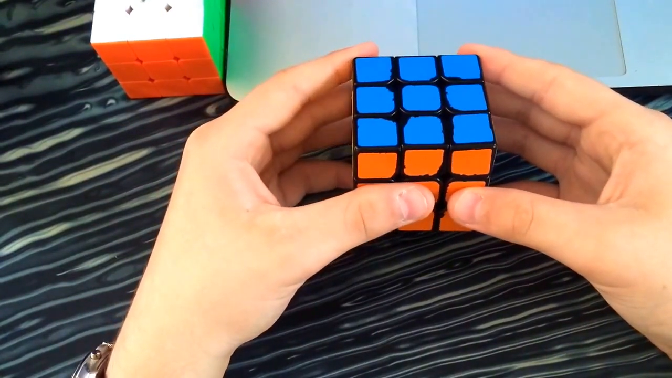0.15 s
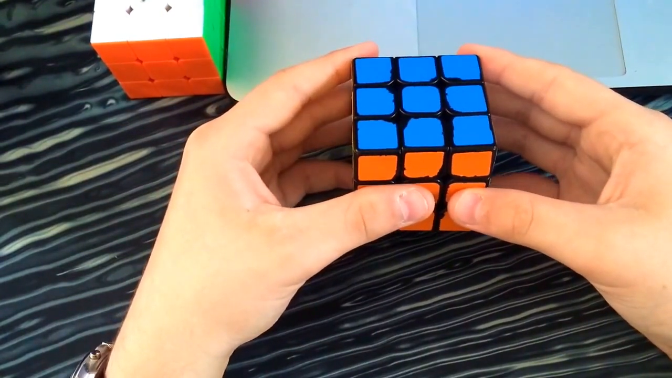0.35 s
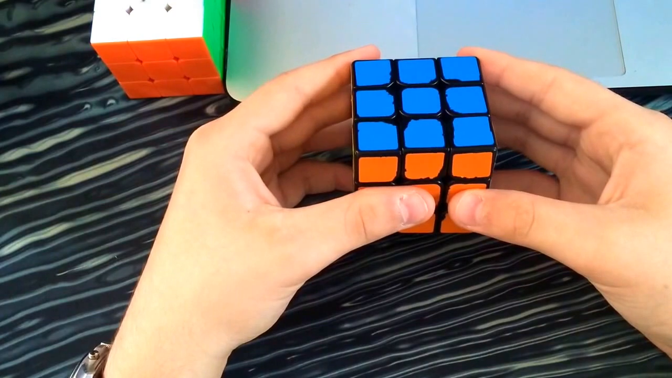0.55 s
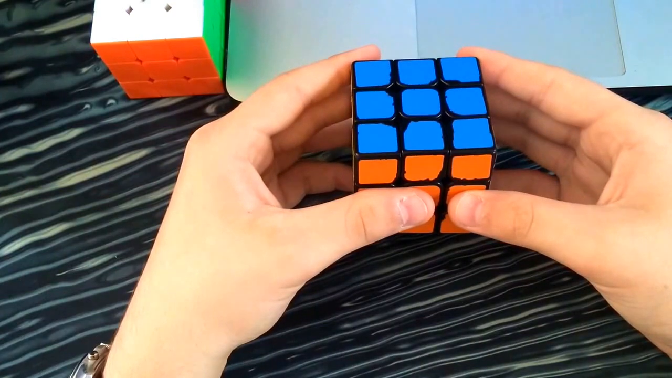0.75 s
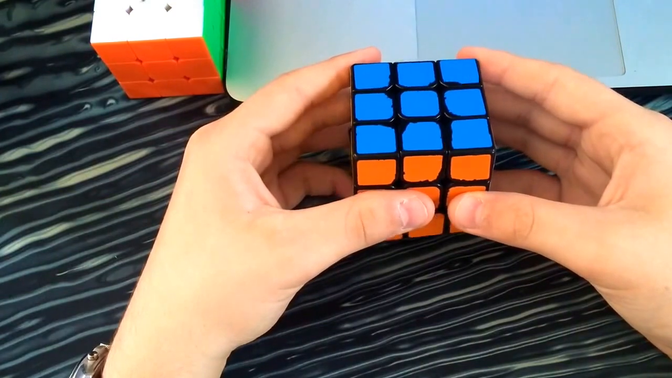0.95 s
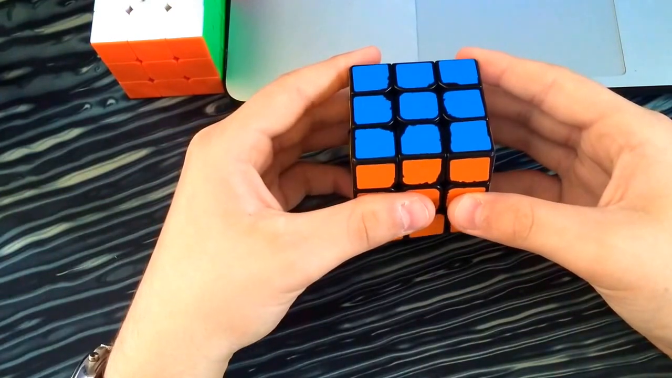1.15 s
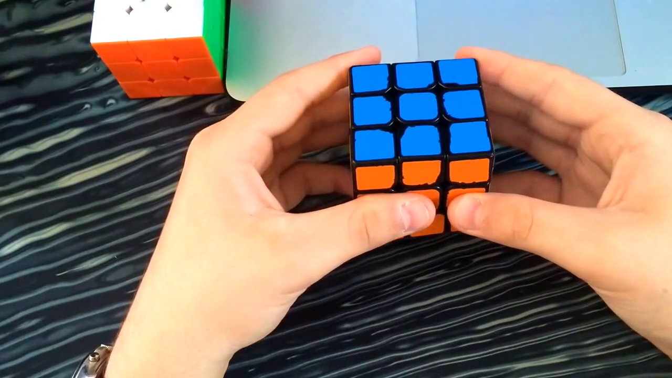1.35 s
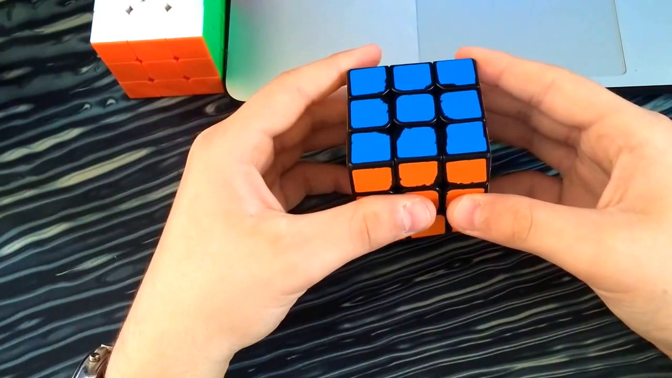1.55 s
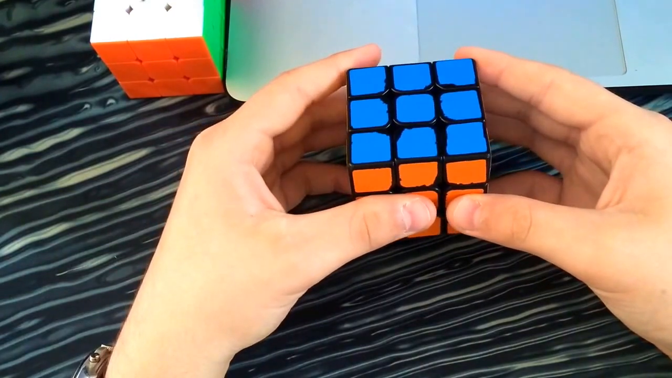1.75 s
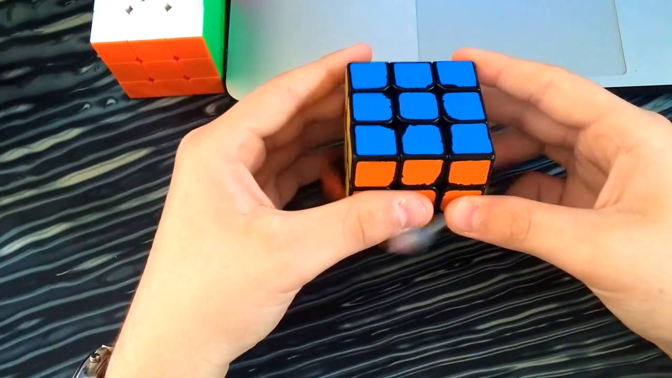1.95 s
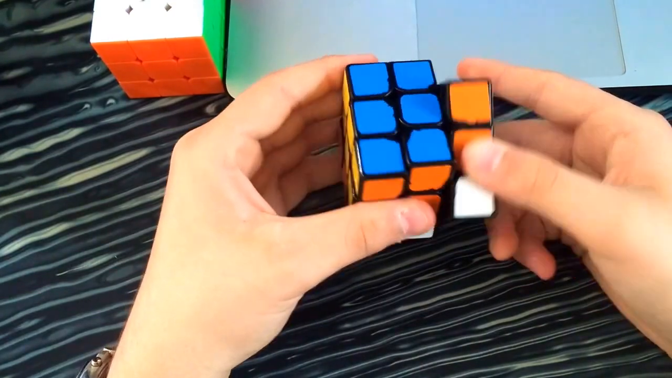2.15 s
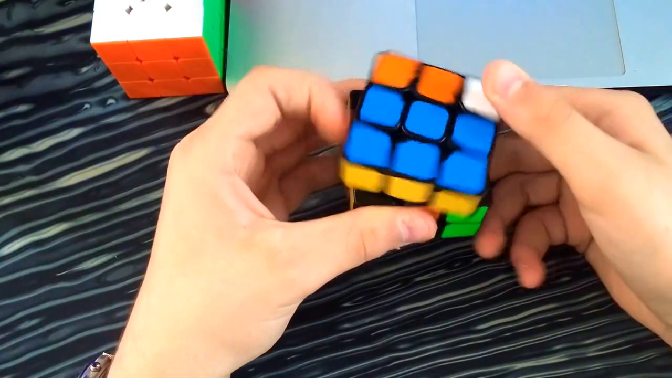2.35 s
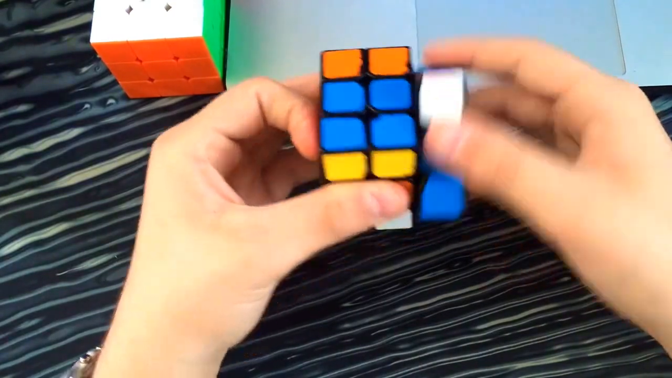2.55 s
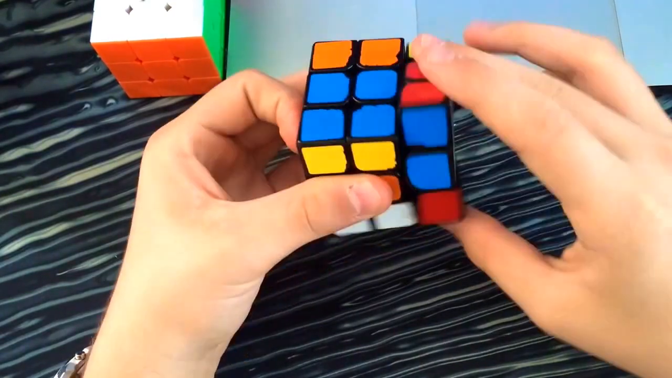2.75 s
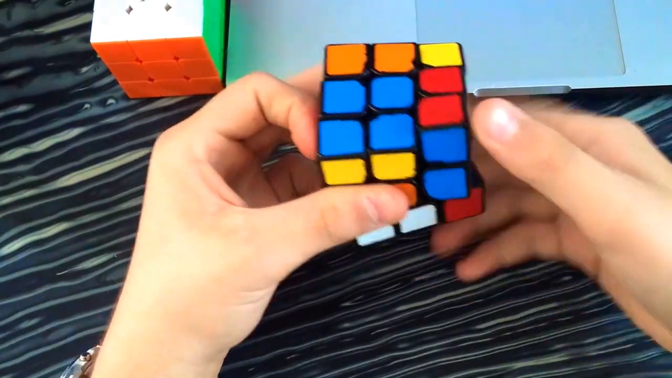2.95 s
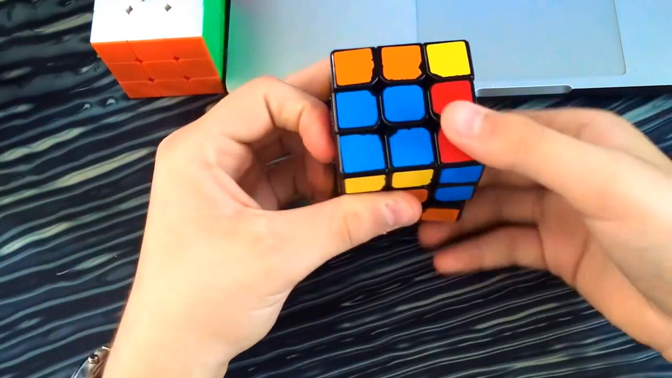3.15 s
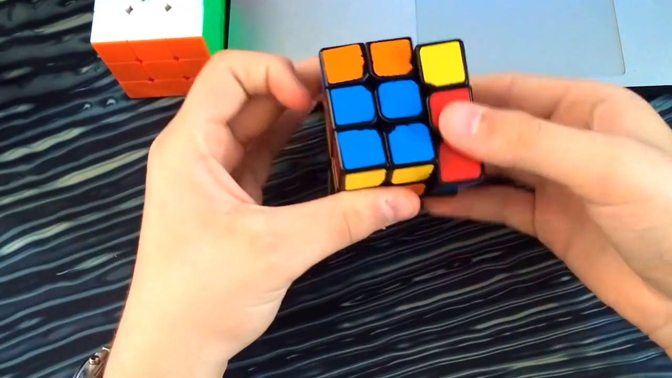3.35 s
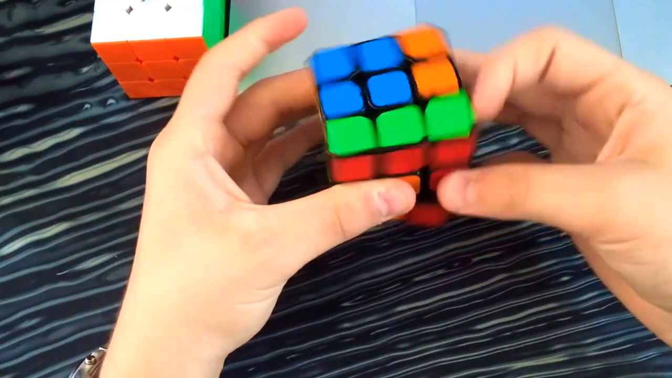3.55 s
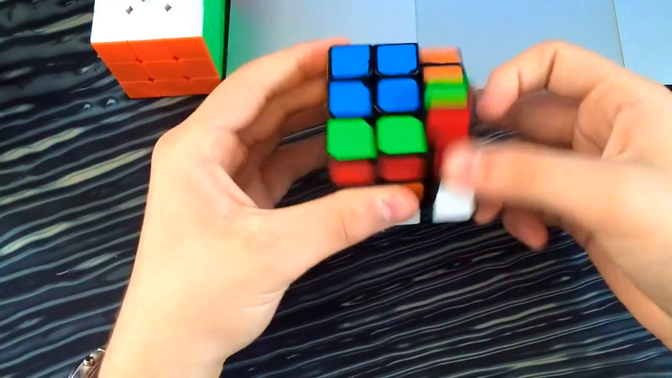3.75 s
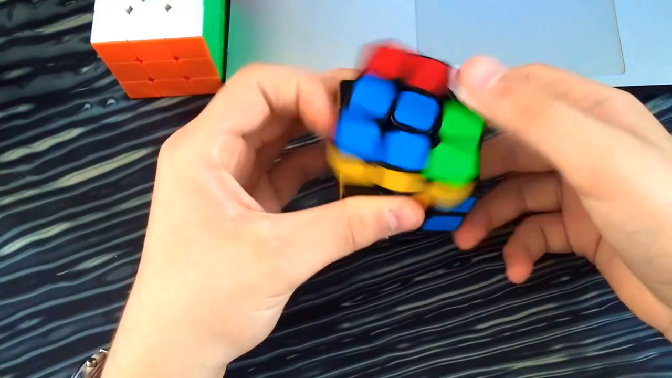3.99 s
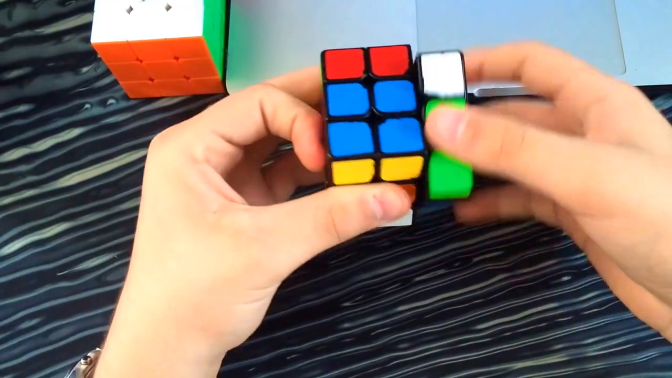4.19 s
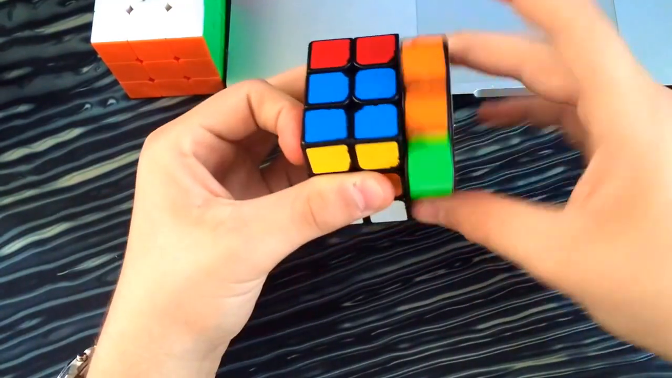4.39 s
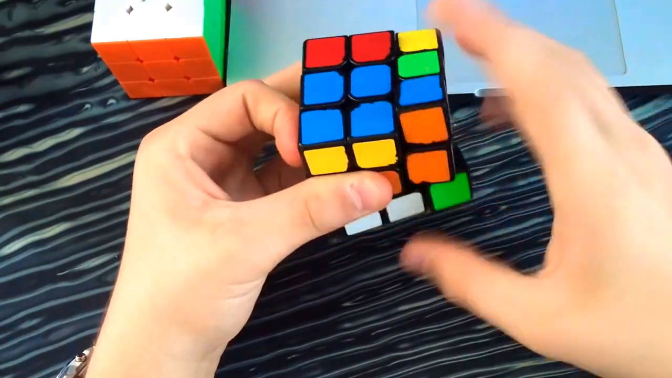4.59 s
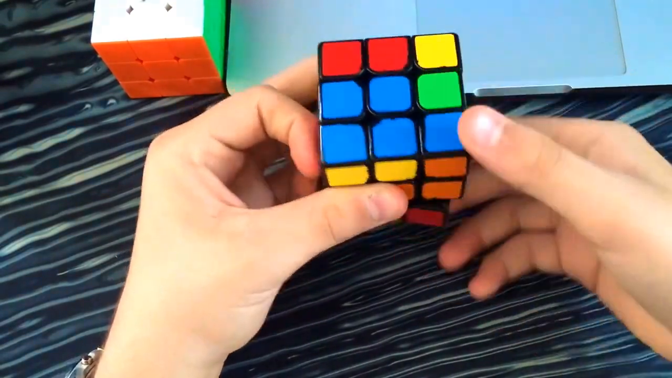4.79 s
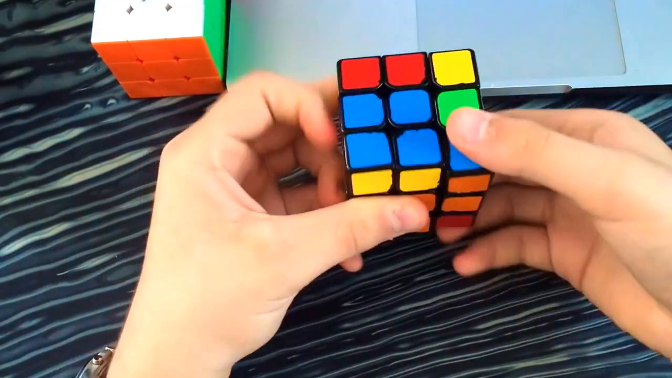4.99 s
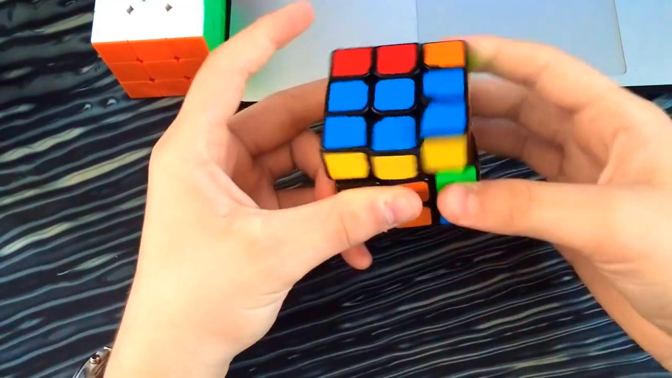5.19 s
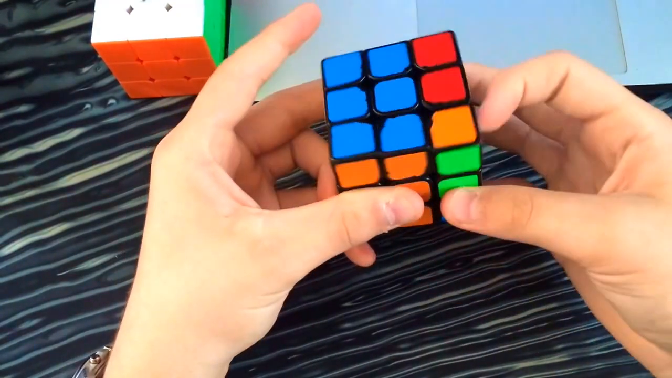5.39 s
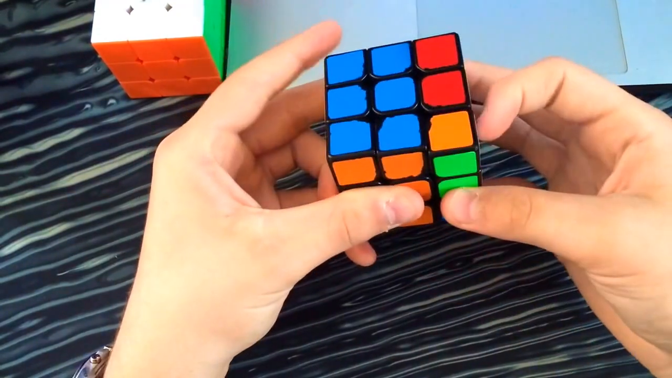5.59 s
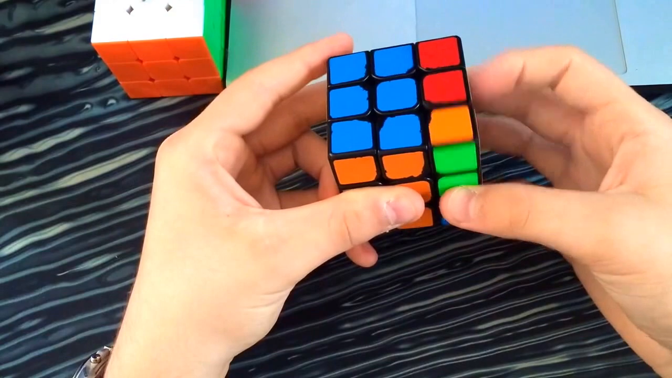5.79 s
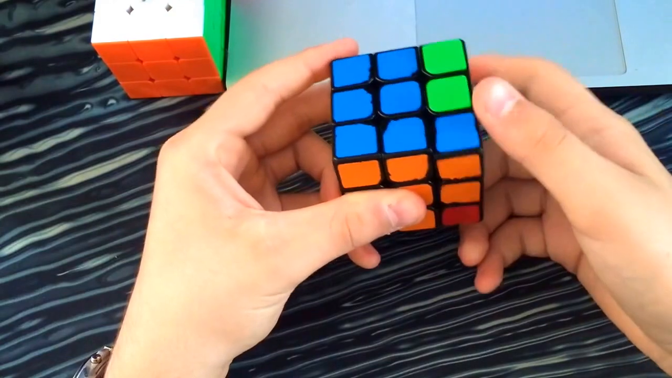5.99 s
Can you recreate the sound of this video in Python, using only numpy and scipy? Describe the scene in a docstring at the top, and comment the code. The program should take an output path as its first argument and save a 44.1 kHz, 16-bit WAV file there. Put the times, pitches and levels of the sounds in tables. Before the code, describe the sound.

A plastic puzzle cube is twisted by hand close to the microphone, indoors with almost no echo. After a near-silent start with one tiny tick, the layers turn in rapid bursts, making crisp clicks, small rattles and a dry sliding scrape. Tiny gaps separate the turns, and a slightly longer pause comes before the last few clicks. A faint low hum and hiss lie underneath throughout.

```python
"""A small furnished room: a plastic puzzle cube is turned quickly close to the microphone.
Pieces catch and snap against each other, each snap ringing the hollow plastic for a few milliseconds;
the layers rasp and tick as they slide. Behind are a humming motor, three soft low thuds,
room rumble and microphone hiss."""
import sys
import numpy as np
from scipy import signal
from scipy.fft import rfft, irfft, next_fast_len
from scipy.io import wavfile
from scipy.ndimage import uniform_filter1d

SR = 44100
rng = np.random.default_rng(int(sys.argv[2]) if len(sys.argv) > 2 else 0)


def int16_out(signal):
    """Quantize to a 16-bit WAV file."""
    q = np.round(np.clip(np.atleast_2d(signal).T, -1, 1) * 32767)
    wavfile.write(sys.argv[1], SR, q.astype(np.int16))


N = 265923

# pieces snapping past each other:
# (time [s], wall peak [dB], brightest pitch [Hz], hollow re wall [dB], edge re wall [dB])
SNAPS = [(0.942, -58, 6000, -14, -2), (1.9332, -51, 4970, -8, -27), (1.9686, -36, 3850, -11, -7),
         (2.003, -38, 4900, -6.5, -17), (2.0211, -38.5, 3860, -3, -16), (2.0354, -41.5, 3900, -6, -12),
         (2.0424, -40, 4900, -4, -17), (2.0497, -24, 3750, -5.5, -18.5), (2.068, -46, 5100, -10, -13),
         (2.103, -28, 5640, -7.5, -14), (2.1176, -44, 4300, -14, -19), (2.1533, -36.5, 6370, -21, -17),
         (2.1818, -26, 5350, -18, -17), (2.1878, -39.5, 5270, -0.5, -11), (2.1965, -32.5, 5100, -8, -15),
         (2.2203, -43, 5900, -6, -13), (2.2312, -31, 4960, -8, -21), (2.246, -40, 4200, -8, -15),
         (2.2522, -46, 4400, -3, -19), (2.302, -50, 3600, -2, -21), (2.311, -46, 5000, -3, -14),
         (2.324, -41, 4770, 0.5, -20), (2.351, -31, 4200, -4.5, -17), (2.3641, -33, 5300, -6.5, -16),
         (2.3879, -25.5, 6100, -23, -16), (2.4052, -36.5, 5200, -3, -20), (2.4097, -41, 5700, -21, -22),
         (2.443, -42.5, 5100, -3, -14), (2.4483, -34, 4470, -19, -19), (2.451, -39.5, 4180, -9, -19),
         (2.458, -41, 4600, -21, -7.5), (2.465, -45.5, 4500, -8, -15), (2.5594, -48.5, 5880, -12, -10),
         (2.57, -39.5, 6600, -9, -15), (2.6058, -37.5, 4850, -3.5, -15), (2.618, -41, 5600, -2, -10),
         (2.6249, -36.5, 4260, -7, -17), (2.6497, -43, 5200, -14, -14), (2.6637, -41, 5200, -3, -8),
         (2.7116, -44.5, 7000, -17, -7), (2.7227, -45, 5200, -16, -14), (2.7397, -20.5, 4020, -16, -14.5),
         (2.7468, -31.5, 4970, -1.5, -13), (2.7674, -41, 6400, -11, -9), (2.781, -47.5, 5200, -5, -13),
         (2.7892, -45, 4900, -11, -13), (2.8096, -50, 5500, -17, -5), (2.852, -41, 4700, 3, -12),
         (2.8706, -34, 4300, -16, -32), (2.88, -40.5, 4840, -9, -24), (2.986, -61, 4780, 4, -14),
         (3.0873, -27, 5900, -10, -15), (3.104, -20, 5900, -1.5, -5.5), (3.109, -18, 5500, -17, -13),
         (3.1199, -16, 4700, -6.5, -20), (3.131, -33, 5500, -7, -15), (3.141, -18, 5250, -15, -19),
         (3.1584, -20, 5670, -15, -12), (3.264, -49, 4440, -14, -10), (3.2713, -54, 6800, -14, -4),
         (3.4108, -50.5, 5300, -14, -8), (3.4232, -49, 6100, -13, -10), (3.4412, -33, 4900, -9, -15),
         (3.4657, -41.5, 5100, -6, -11), (3.503, -26, 5970, -18, -19), (3.513, -21.5, 4650, -7.5, -13.5),
         (3.525, -40, 6000, -16, -14), (3.551, -22, 5900, -12, -10), (3.5696, -33, 6200, -6, -10),
         (3.5836, -31, 5500, -4, -10), (3.5932, -26.5, 5500, -8.5, -20), (3.5993, -28, 5940, -6, -13),
         (3.6159, -35, 6600, -9, -7), (3.633, -31, 6400, -13, -13), (3.6391, -26, 6650, -15, -18),
         (3.648, -35, 5300, -3, -10), (3.6523, -44, 5400, -4, -13), (3.679, -48, 7000, -11, -8),
         (3.691, -34, 5140, 0, -9), (3.696, -22, 5250, -14, -16), (3.7117, -34, 5800, -3.5, -12),
         (3.722, -38.5, 5400, -1.5, -13), (3.732, -45.5, 5600, -5, -20), (3.8053, -40, 5260, -9, -14),
         (3.8187, -45, 4000, -2, -20), (3.825, -25, 4140, -11.5, -18), (3.8394, -32.5, 4260, -4.5, -26),
         (3.8488, -30.5, 4940, -15, -31), (3.861, -30, 5830, -4, -15), (3.867, -29, 6140, -12, -11),
         (3.8726, -23.5, 5050, -11.5, -22), (3.9208, -38.5, 5300, -9, -14),
         (3.9632, -27.5, 4640, -13, -18.5), (4.0033, -43, 4290, -17, -16), (4.018, -43.5, 6580, -13, -14),
         (4.0616, -24, 5160, -12, -18.5), (4.084, -35.5, 5330, -7, -15), (4.099, -35, 5600, -10, -8),
         (4.1337, -49.5, 4200, 1, -14), (4.1999, -36.5, 5650, -10, -8), (4.258, -48, 3800, 3, -9),
         (4.358, -45.5, 5470, -1, -11), (4.3816, -40.5, 5800, -5, -7), (4.4347, -47, 4530, -9, -15),
         (4.449, -22, 5500, -10.5, -17), (4.4821, -48, 6100, -13, -15), (4.4952, -36.5, 6230, -10, -15),
         (4.514, -42, 6100, -1, -17), (4.5217, -40, 6300, 2.5, -18), (4.5547, -55, 6060, -13, -4),
         (4.5844, -54, 4900, -9, -12), (4.6117, -36, 4660, -11, -19), (4.6187, -36, 4730, -4, -20),
         (4.777, -50, 7300, -12, 0), (4.7831, -44, 5600, 2, -12), (4.793, -19.5, 6050, -5.5, -10.5),
         (4.812, -31, 4800, 0, -19), (4.8223, -38.5, 5500, -4, -13), (4.833, -20.5, 6430, -10, -14.5),
         (4.8398, -31, 5000, -4, -13), (4.8454, -27.5, 4970, -12, -11), (4.988, -61, 6300, 1, 0),
         (5.0001, -40, 4300, -7.5, -14), (5.0785, -54.5, 5350, -16, -8), (5.1163, -40.5, 4290, -3, -14),
         (5.1226, -49.5, 5000, 6, -22), (5.1578, -36, 6570, -11, -14), (5.1893, -53, 6900, -17, -11),
         (5.2, -36.5, 4800, -4.5, -11), (5.21, -37.5, 4400, -4.5, -9), (5.2497, -51, 5800, -9, -13),
         (5.256, -48.5, 5400, -10, -8), (5.3028, -36.5, 4330, -8, -16), (5.3176, -51, 4500, 5, -11),
         (5.3271, -37, 3860, -3.5, -15), (5.3622, -42.5, 5440, -4, -9), (5.3695, -37, 5000, 2, -7),
         (5.3787, -32, 4640, -2, -14.5), (5.3845, -43, 3600, 0, -19), (5.4158, -46, 5200, -5, -8),
         (5.4225, -49, 3900, 8, -7), (5.5619, -46, 5260, -1, -7), (5.746, -63.5, 5310, -1, -12.5),
         (5.8961, -48.5, 6820, -26, -5), (5.934, -33.5, 4480, -2, -20), (5.9438, -43, 4750, -1, -11),
         (5.9474, -37.5, 5400, -10, -15), (5.9543, -37.5, 4600, -12, -12), (5.974, -46, 6700, -9, -10),
         (5.986, -45, 4840, -4, -17), (5.9942, -48, 5450, -2, -11), (6.0092, -53, 4900, -7.5, -6)]
# layers sliding: (start [s], length [s], rasp level [dB])
TURNS = [(.89, 0.042, -83), (1.961, 0.16, -69), (2.172, 0.09, -62), (2.302, 0.18, -67),
         (2.468, 0.083, -71.5), (2.558, .12, -64), (2.71, 0.17, -70), (3.033, 0.082, -59.5),
         (3.086, 0.047, -53), (3.174, 0.048, -74), (3.249, 0.21, -72), (3.448, 0.041, -66),
         (3.502, 0.17, -53), (3.688, 0.045, -55), (3.803, 0.092, -65), (3.938, .1, -67),
         (4.051, 0.053, -60.5), (4.16, 0.087, -69), (4.25, .14, -69.5), (4.432, 0.098, -67),
         (4.541, 0.073, -74), (4.629, .14, -81.5), (4.771, .09, -58), (4.985, 0.027, -82),
         (5.109, 0.16, -71), (5.3, 0.1, -64), (5.43, .04, -80), (5.842, 0.089, -81.5), (5.93, 0.08, -67)]
# cube resonances: (frequency [Hz], relative gain [dB], t60 [s])
CUBE_MODES = [(409, 5, 0.027), (552, 1.5, 0.016), (730, 2.5, 0.0095), (885, 3, 0.007), (1120, -2.5, 0.0056),
              (1391, -9.5, 0.017), (1634, -11.5, 0.01), (2137, -0.5, 0.0075), (2493, -1, 0.0047),
              (2784, -11.5, 0.01), (3013, 1, 0.0076), (3470, 0, 0.0078), (3910, -2.5, 0.0072),
              (4410, -1.5, 0.0071), (4970, 1, 0.006), (5620, 2, 0.0034), (5960, 2, 0.006),
              (6380, 5.5, 0.0027), (6950, 3.5, 0.0045), (7560, 1.5, 0.0044), (8260, -0.5, 0.0054),
              (8850, -1, 0.0055), (9740, 1.5, 0.0035), (10570, -0.5, 0.0058), (11430, -2, 0.0052),
              (12250, -4, 0.0061), (13960, -3.5, 0.0023), (14400, -15.5, 0.0045)]
# mode bands of whole shell, hollow pieces, small walls, thin edges: (boundary [Hz])
PART_BOUNDS_HZ = [0, 1500, 2845, 8625, 20000]


def amp(db):
    """Decibels to gain."""
    return 10 ** (np.asarray(db) / 20)


def unit_rms(x):
    """Scale to rms 1."""
    return x / np.sqrt(np.mean(x ** 2) + 1e-20)


def drift(rate_hz):
    """Slow wander, rms 1: noise at SR / 40 through a double low-pass."""
    pole = np.exp(-2 * np.pi * rate_hz * 40 / SR)
    slow = signal.lfilter([1], [1, -2 * pole, pole * pole], rng.standard_normal(N // 40 + 2002))[2000:]
    return np.interp(np.arange(N) / 40, np.arange(len(slow)), unit_rms(slow))


def noise_floor(rms_db):
    """Steady room rumble and microphone hiss."""
    # noise spectrum: (frequency [Hz], relative density [dB])
    spectrum = [(20, -23.5), (45, -6.5), (60, -5.5), (150, -1), (200, -7), (350, -14.5), (550, -17),
                (800, -20.5), (1600, -29.5), (3000, -33), (9000, -36), (15000, -43), (20000, -55.5)]
    knot_hz, knot_db = np.transpose(spectrum)
    size = next_fast_len(N)
    hz = np.maximum(np.arange(size // 2 + 1) * SR / size, 1)
    colour = amp(np.interp(np.log(hz), np.log(knot_hz), knot_db))
    return amp(rms_db) * unit_rms(irfft(rfft(rng.standard_normal(size)) * colour, size)[:N])


def motor_hum():
    """Hum and faint whine, each tone wandering in level and phase."""
    # motor tones: (frequency [Hz], rms level [dB], waver [dB])
    tones = [(59.5, -63, -1.2), (80, -70, 4), (118, -85, -0.5), (171, -65.5, 1.4), (238.5, -80, 2.5),
             (295.7, -80.5, 1.5), (355.4, -81, 3), (415, -99, 1), (499, -87.5, 4.5), (2672, -101, 4),
             (2710, -97, 2)]
    t, out = np.arange(N) / SR, np.zeros(N)
    for hz, db, waver_db in tones:
        phase = 2 * np.pi * (hz * t + rng.random()) + 0.21 * waver_db * drift(5.2)
        out += np.sqrt(2) * amp(db + waver_db * drift(6.3)) * np.sin(phase)
    return out


def thuds(rise_s):
    """Soft pushes: a low tone swells and dies within a few cycles."""
    # pushes: (time [s], envelope peak [dB], frequency [Hz])
    pushes = [(0.261, -50, 78), (1.471, -50, 80), (3.02, -48, 110)]
    t, out = np.arange(N) / SR, np.zeros(N)
    for start_s, peak_db, hz in pushes:
        age = np.clip(t - start_s, 0, None) / rise_s
        out += amp(peak_db) * age * np.exp(1 - age) * np.sin(2 * np.pi * hz * (t - start_s))
    return out


def room_echo(x, t60_s, wall_cut_hz):
    """Wall reflections: twelve feedback delays, duller on every round."""
    size = next_fast_len(N + SR)
    omega = 2 * np.pi * np.arange(size // 2 + 1) / size
    wall_lowpass = 1 / (1 + 1j * omega * SR / (2 * np.pi * wall_cut_hz)) ** 0.17
    lags = np.geomspace(0.004, 0.03, num=12) * SR * rng.uniform(0.93, 1.07, 12)
    response = 0
    for k, lag in enumerate(lags):
        loop = amp(-60 * lag / SR / t60_s) * wall_lowpass * np.exp(-1j * omega * np.round(lag))
        response = response + (-1) ** k * loop / (1 - loop)
    return irfft(rfft(x, size) * response, size)[:N]


def ring(force, hz, t60_s):
    """One mode: each impulse starts a decaying sine."""
    radius, omega = amp(-60 / (t60_s * SR)), 2 * np.pi * hz / SR
    return signal.lfilter([0, np.sin(omega)], [1, -2 * radius * np.cos(omega), radius ** 2], force + 1e-18)


def radiate(x, cut_hz=954):
    """So small a body radiates little bass."""
    return signal.sosfilt(signal.butter(3, cut_hz, "high", fs=SR, output="sos"), x)


def rasp_envelope(attack_db_per_s=1499.5, release_db_per_s=253, shake_db=-31.5, shake_db_per_s=298.5):
    """Each turn swells, holds and fades; pieces shaken by a snap rasp on briefly."""
    t, turn_power, jolts = np.arange(N) / SR, np.zeros(N), np.zeros(N)
    for start_s, length_s, db in TURNS:
        before_s = np.maximum(start_s - t, 0)
        after_s = np.maximum(t - start_s - length_s, 0)
        turn_power += amp(db - attack_db_per_s * before_s - release_db_per_s * after_s) ** 2
    for time_s, peak_db, *_ in SNAPS:
        jolts[int(time_s * SR)] = amp(peak_db + shake_db) ** 2
    shake_power = signal.lfilter([1], [1, -amp(-shake_db_per_s / SR) ** 2], jolts + 1e-18)
    return np.sqrt(turn_power + shake_power)


def rasp(slips_per_s, spread_db, part_db):
    """Sliding faces slip in dense, uneven clicks; each rings a random 40% of the modes."""
    sizes = amp(spread_db * np.minimum(rng.exponential(1, N), 5)) * rng.choice([-1, 1], N)
    slips = sizes * (rng.random(N) < slips_per_s * amp(3 * drift(60)) / SR)
    touched = rng.random((len(CUBE_MODES), N)) < 0.4
    parts = np.searchsorted(PART_BOUNDS_HZ, np.array(CUBE_MODES)[:, 0]) - 1
    ringing = sum(amp(db + part_db[part]) * ring(slips * hit, hz, t60_s)
                  for hit, part, (hz, db, t60_s) in zip(touched, parts, CUBE_MODES))
    return rasp_envelope() * unit_rms(radiate(ringing))


def ticks(per_s=16, bright_hz=5300):
    """Faint random ticks while a layer slides, louder with its rasp; rows as in SNAPS."""
    rows = []
    for start_s, length_s, rasp_db in TURNS:
        scatter = rng.standard_normal((12, 4))
        times_s = start_s + length_s * rng.random(12)
        for time_s, (level, pitch, hollow, edge) in zip(times_s[:round(per_s * length_s)], scatter):
            peak_db = 0.69 * rasp_db - 7 + 2.5 * level
            rows.append((time_s, peak_db, bright_hz * (1 + 0.13 * pitch), -6.5 + 6 * hollow, -9 + 5 * edge))
    return rows


def strike(contact, modes, weight_db, scatter_db=3):
    """One row per blow: the contact rings each mode at a random strength; envelope peak 1."""
    gain_db = weight_db + scatter_db * rng.standard_normal((len(contact), len(modes)))
    ringing = sum((-1) ** k * amp(db + gain_db[:, [k]]) * ring(contact, hz, t60_s)
                  for k, (hz, db, t60_s) in enumerate(modes))
    blows = radiate(ringing)
    peak_power = uniform_filter1d(blows ** 2, size=24).max(axis=1, keepdims=True)
    return blows / np.sqrt(2 * peak_power)


def snaps(events, scuff_s, crunch_s, rattle_s):
    """Pieces catch: a faint scuff, a hard crunch and a brief rattle ring the cube's four parts."""
    times_s, peak_db, bright_hz, hollow_db, edge_db = np.transpose(events)
    # the shell's share falls as snaps get harder
    shell_db = -18.5 - 0.36 * (peak_db + 40) + 3 * rng.standard_normal(len(events))
    lead, size = 256, 1792   # samples
    t = (np.arange(size) - lead) / SR
    scuff = 0.12 * np.exp(np.minimum(t, 0) / scuff_s)
    force = np.where(t < 0, scuff, np.exp(-t / crunch_s) + 0.19 * np.exp(-t / rattle_s))
    contact = rng.standard_normal((len(events), size)) * force
    part_db = [shell_db, hollow_db, 0, edge_db]
    focus_db = [1, 2.1, 11.3, 2.6]   # loss one octave from the brightest pitch
    blows = 0
    for part, (low_hz, high_hz) in enumerate(zip(PART_BOUNDS_HZ, PART_BOUNDS_HZ[1:])):
        modes = [mode for mode in CUBE_MODES if low_hz < mode[0] < high_hz]
        octaves = np.log2(np.array(modes)[:, 0] / bright_hz[:, None])
        ringing = strike(contact, modes, -focus_db[part] * octaves ** 2)
        blows = blows + amp(peak_db + part_db[part])[:, None] * ringing
    out = np.zeros(N + size)
    for start, blow in zip(np.round(times_s * SR).astype(int) - lead, blows):
        out[start:start + size] += blow
    return out[:N]


def scene():
    """Cube and its echo over thuds, hum and noise; mono."""
    cube = snaps(SNAPS + ticks(), scuff_s=0.0018, crunch_s=0.00035, rattle_s=0.0042)
    cube += rasp(slips_per_s=5000, spread_db=3.5, part_db=[-16.5, -3.5, -3, -11])
    echo = amp(-27.5) * room_echo(cube, t60_s=0.19, wall_cut_hz=5600)
    background = thuds(rise_s=0.0097) + motor_hum() + noise_floor(rms_db=-63.5)
    return (background + echo + cube)[None]


def record(dry, stop_hz=16300):
    """Steep treble cut."""
    return signal.sosfilt(signal.cheby2(14, 60, stop_hz, fs=SR, output="sos"), dry)


dry = scene()
out = record(dry)
int16_out(out)
```